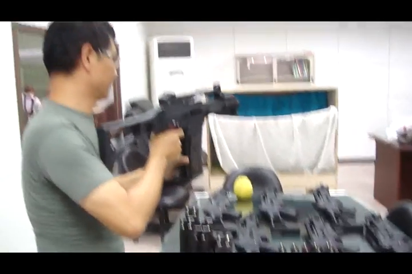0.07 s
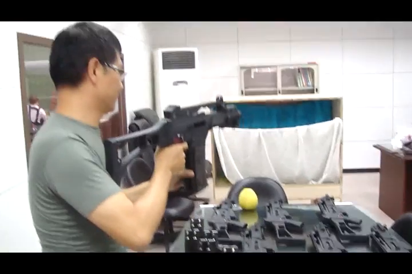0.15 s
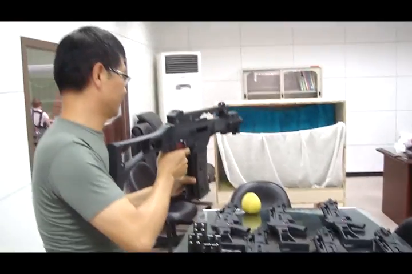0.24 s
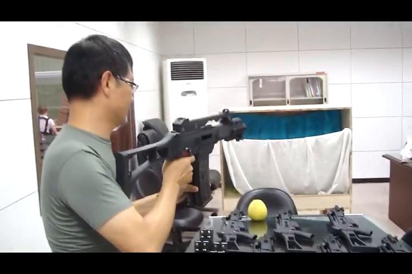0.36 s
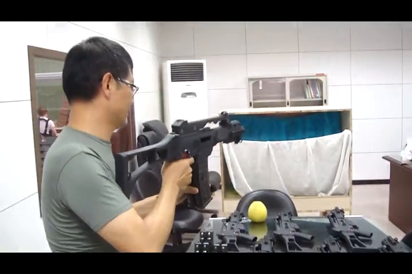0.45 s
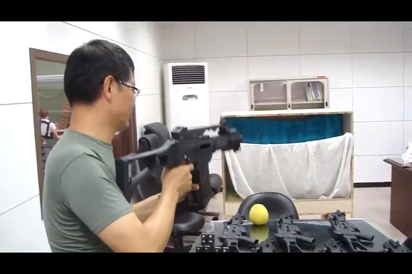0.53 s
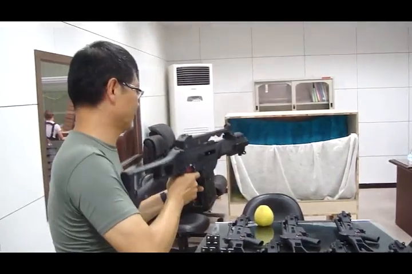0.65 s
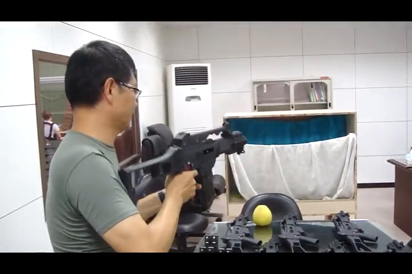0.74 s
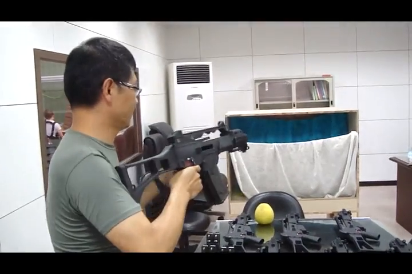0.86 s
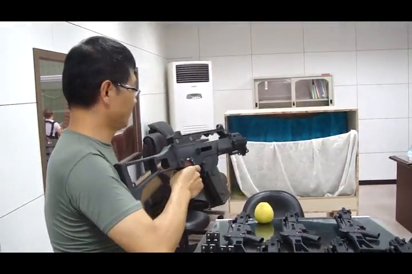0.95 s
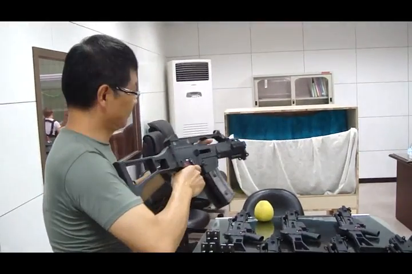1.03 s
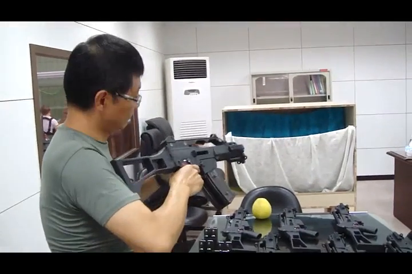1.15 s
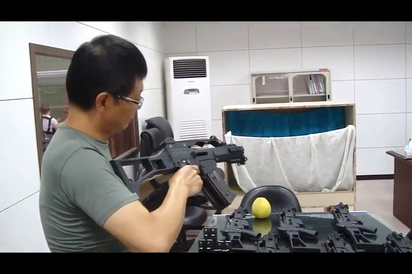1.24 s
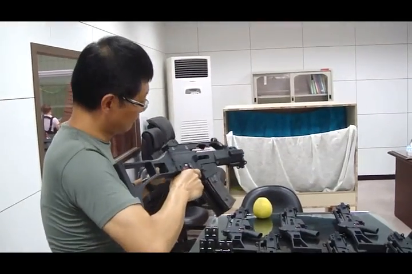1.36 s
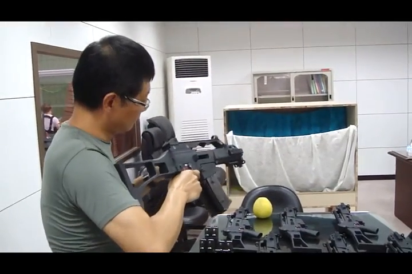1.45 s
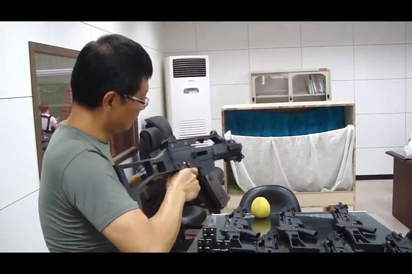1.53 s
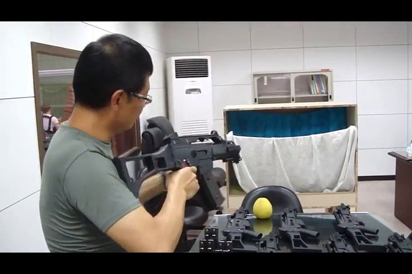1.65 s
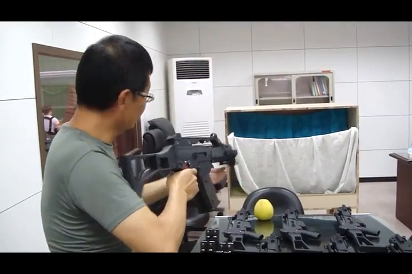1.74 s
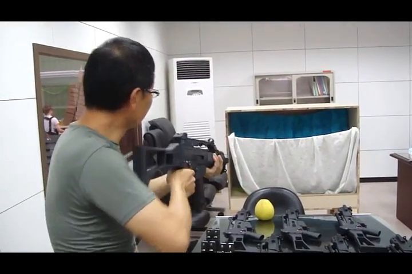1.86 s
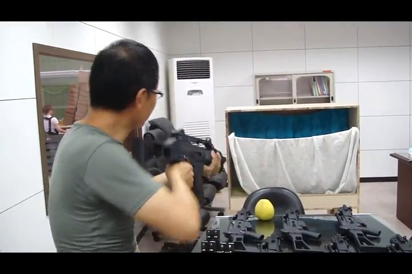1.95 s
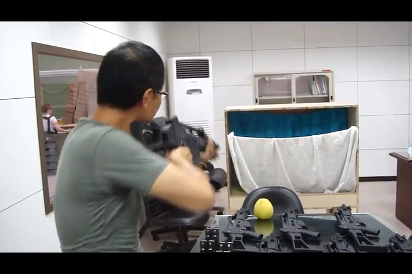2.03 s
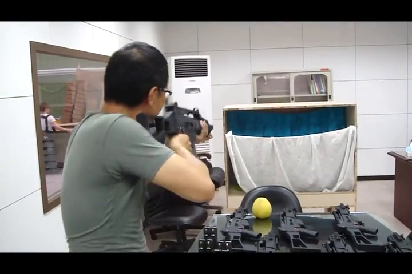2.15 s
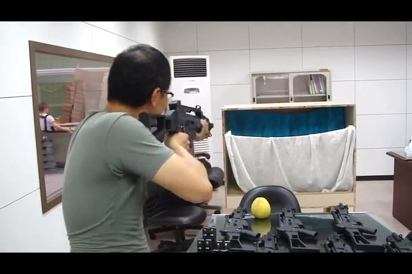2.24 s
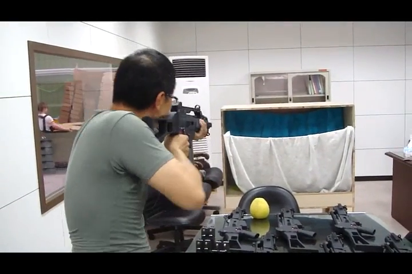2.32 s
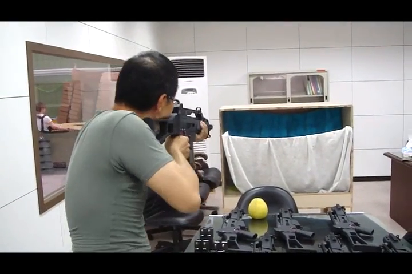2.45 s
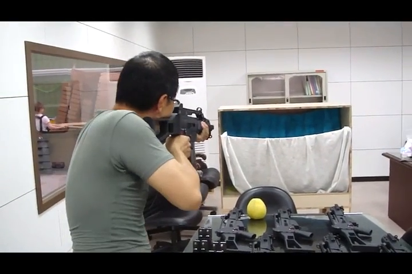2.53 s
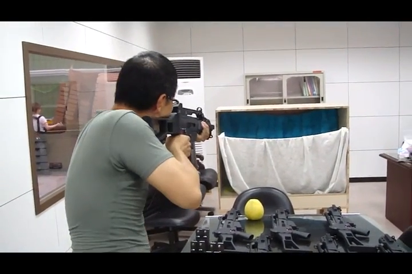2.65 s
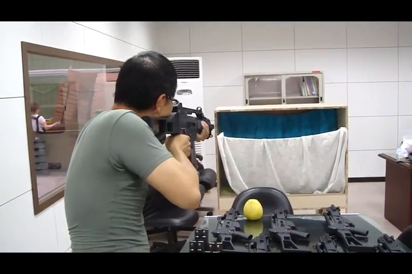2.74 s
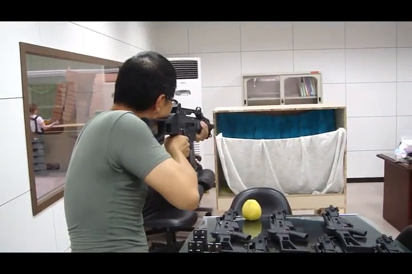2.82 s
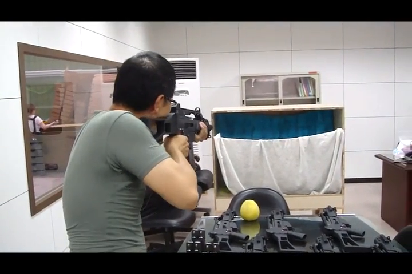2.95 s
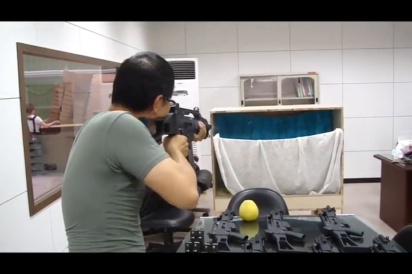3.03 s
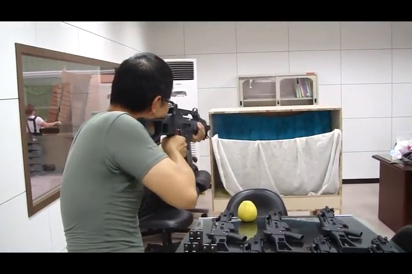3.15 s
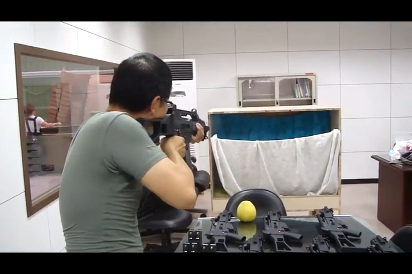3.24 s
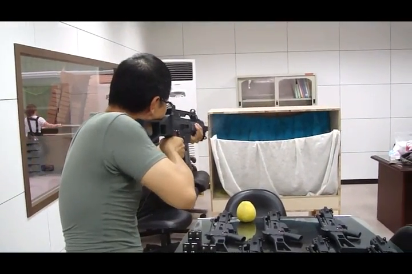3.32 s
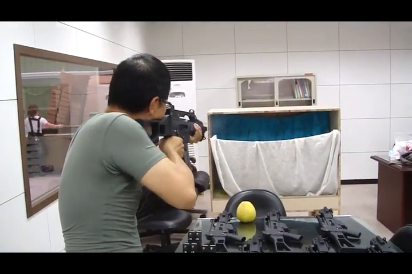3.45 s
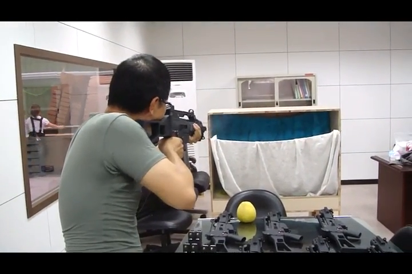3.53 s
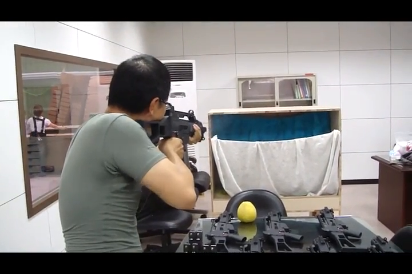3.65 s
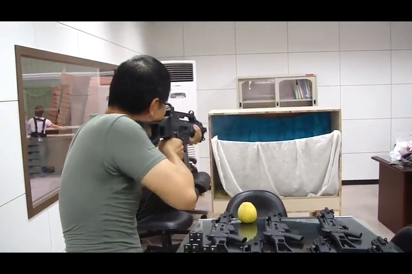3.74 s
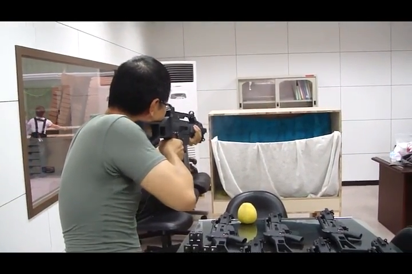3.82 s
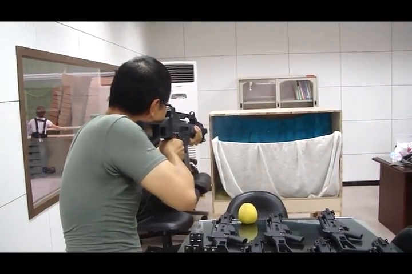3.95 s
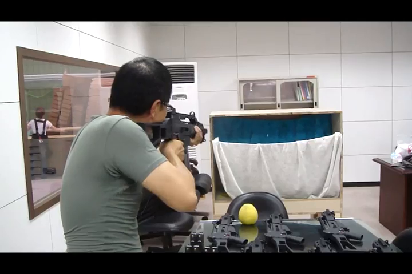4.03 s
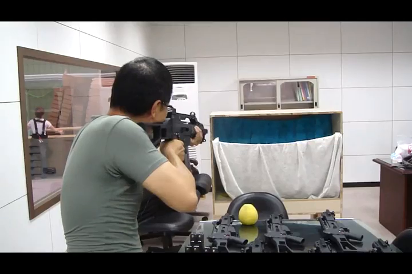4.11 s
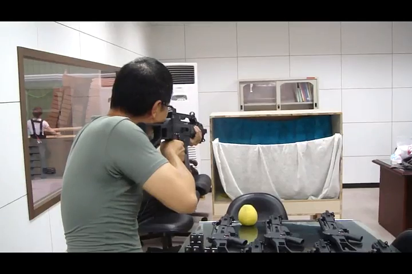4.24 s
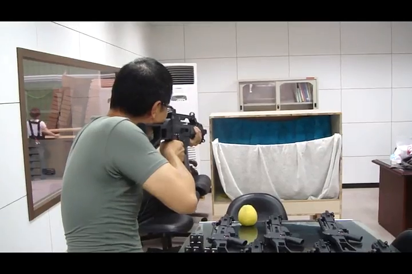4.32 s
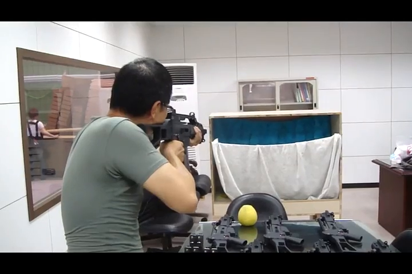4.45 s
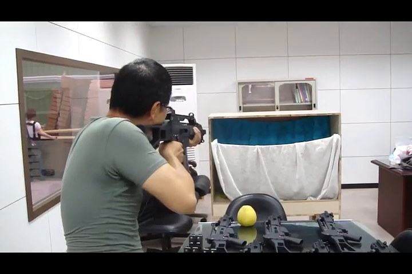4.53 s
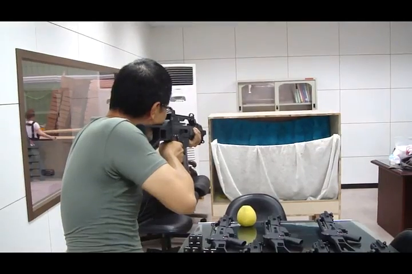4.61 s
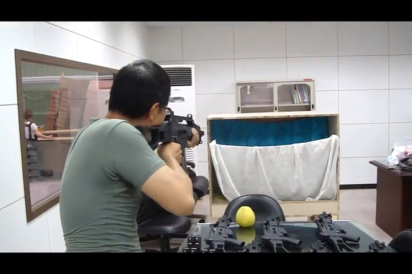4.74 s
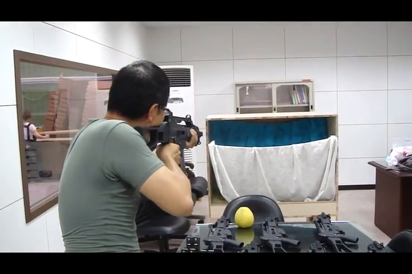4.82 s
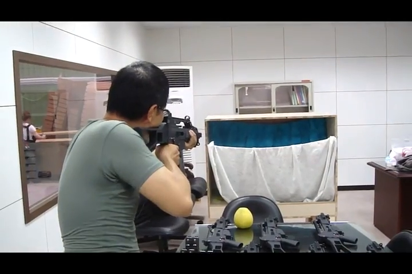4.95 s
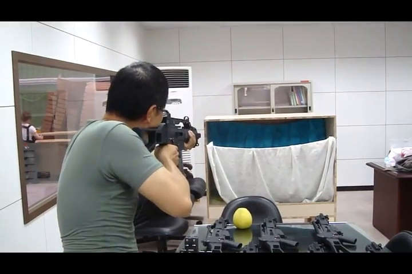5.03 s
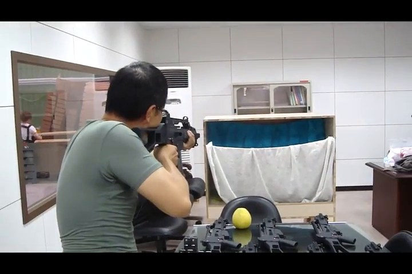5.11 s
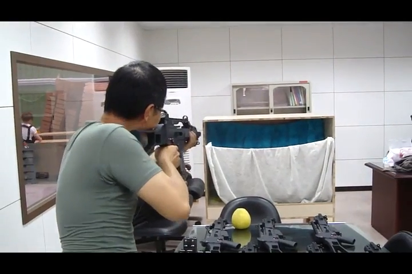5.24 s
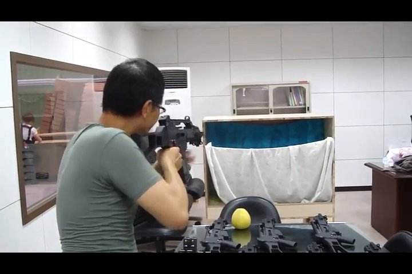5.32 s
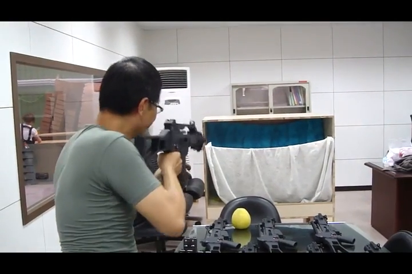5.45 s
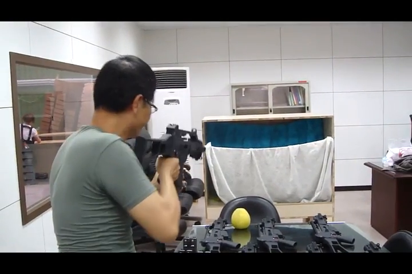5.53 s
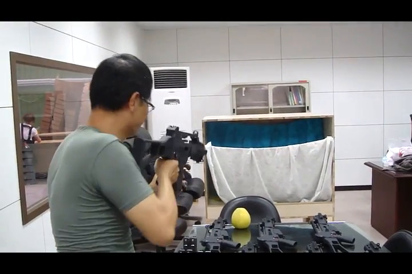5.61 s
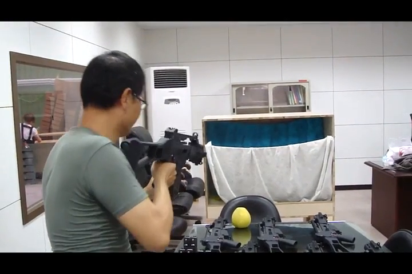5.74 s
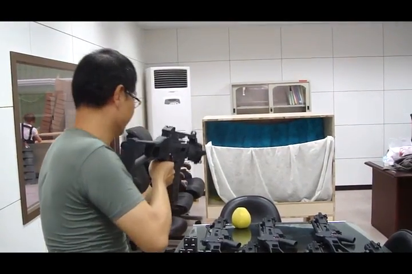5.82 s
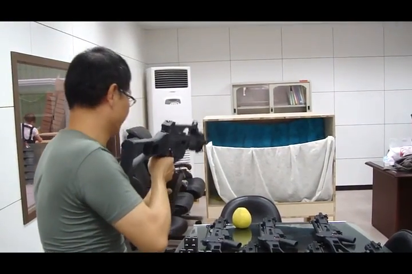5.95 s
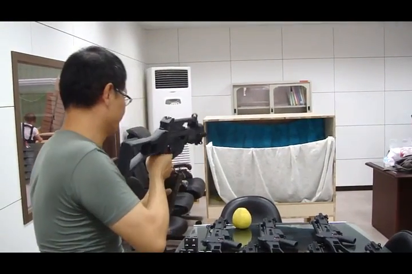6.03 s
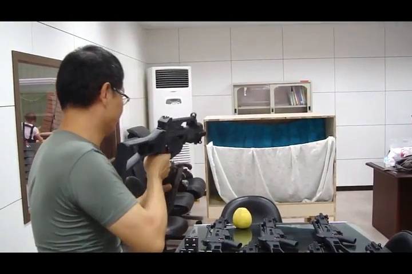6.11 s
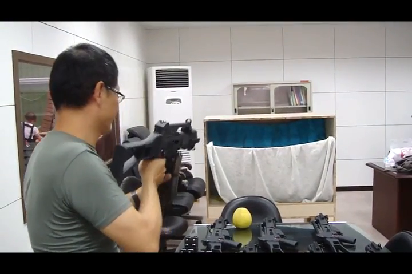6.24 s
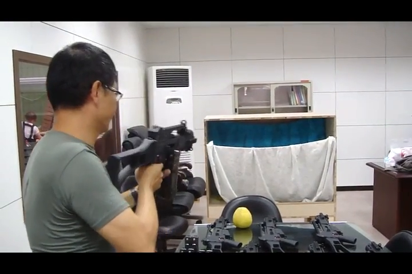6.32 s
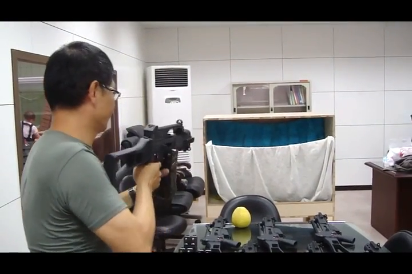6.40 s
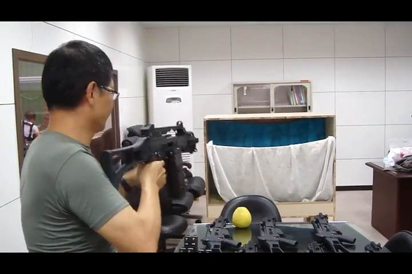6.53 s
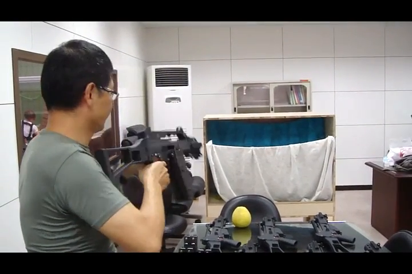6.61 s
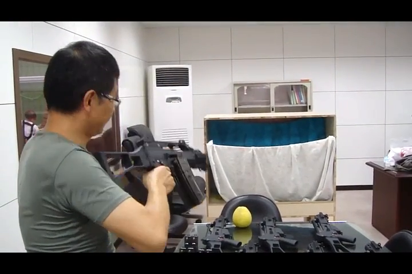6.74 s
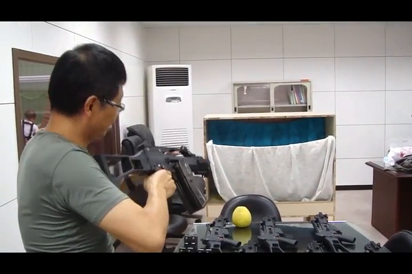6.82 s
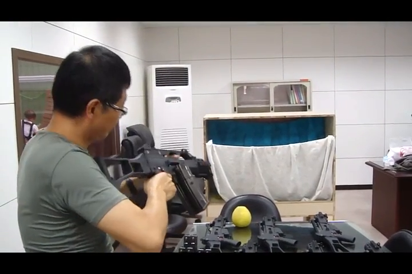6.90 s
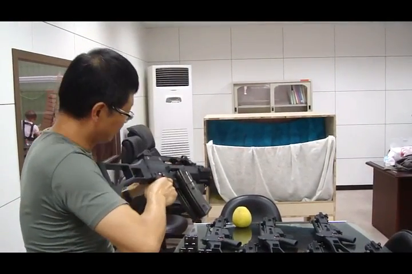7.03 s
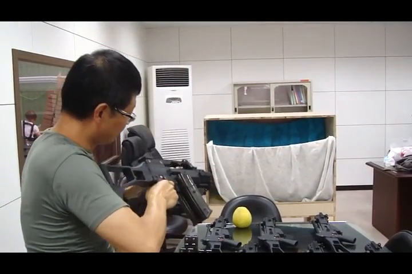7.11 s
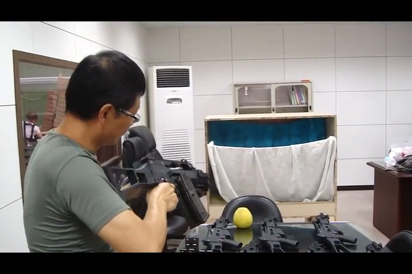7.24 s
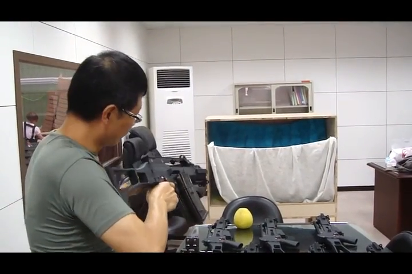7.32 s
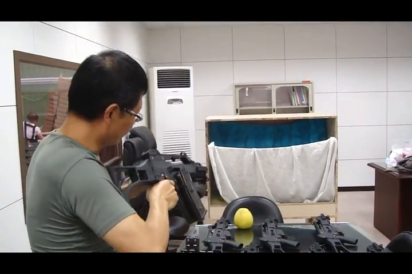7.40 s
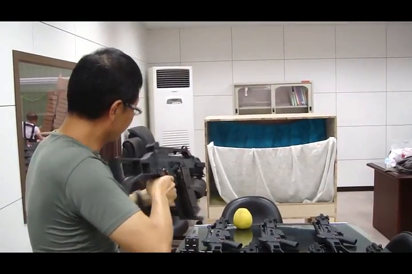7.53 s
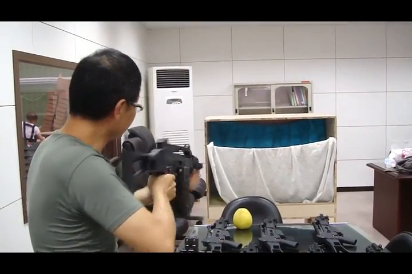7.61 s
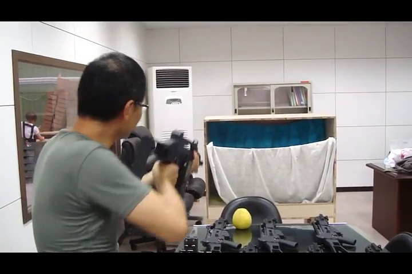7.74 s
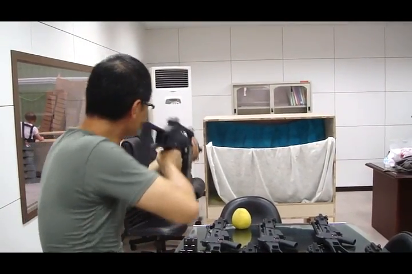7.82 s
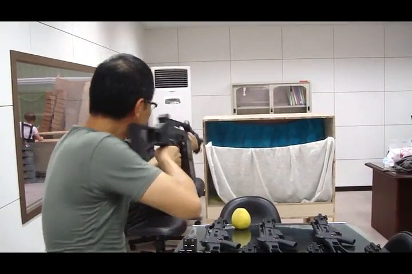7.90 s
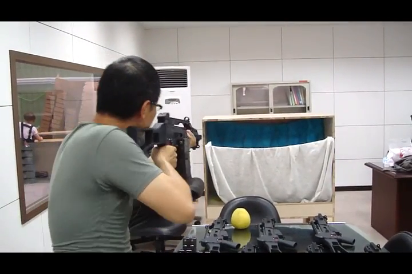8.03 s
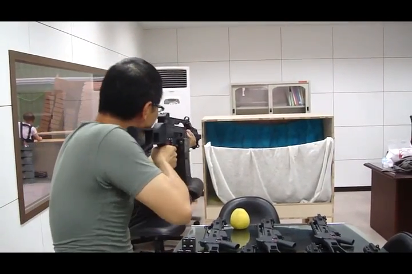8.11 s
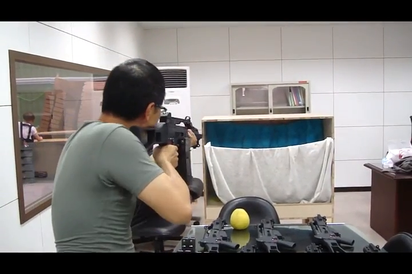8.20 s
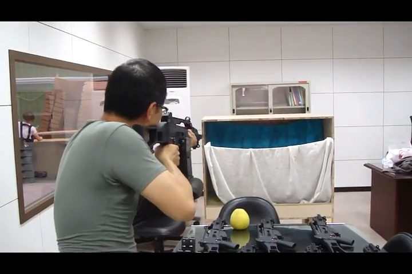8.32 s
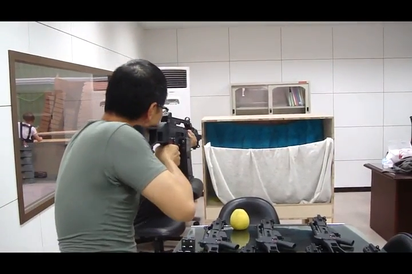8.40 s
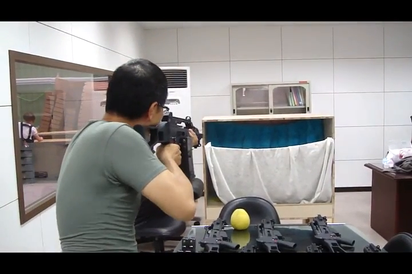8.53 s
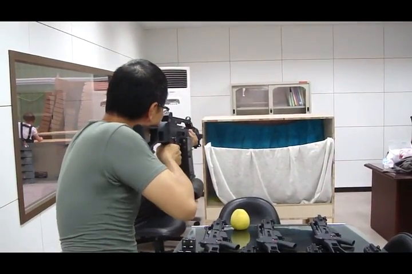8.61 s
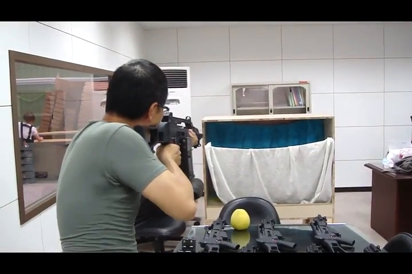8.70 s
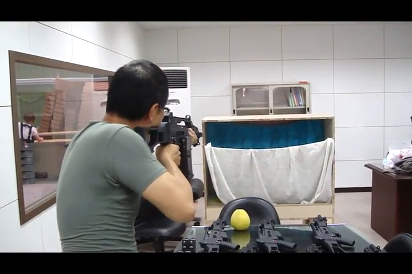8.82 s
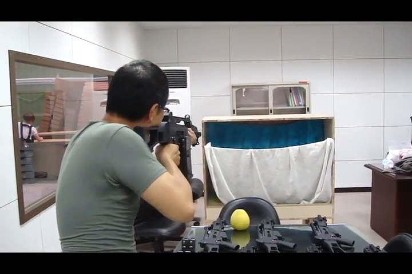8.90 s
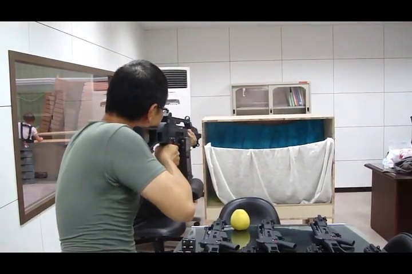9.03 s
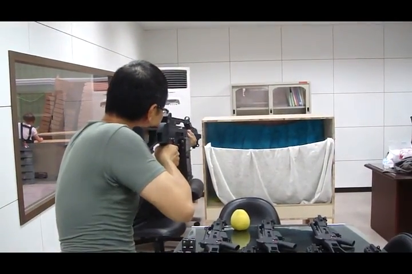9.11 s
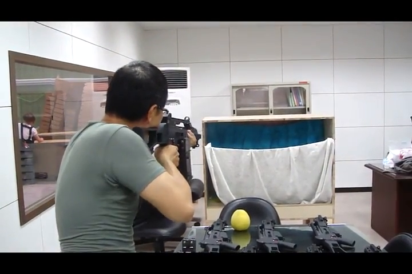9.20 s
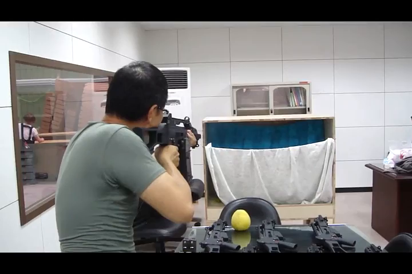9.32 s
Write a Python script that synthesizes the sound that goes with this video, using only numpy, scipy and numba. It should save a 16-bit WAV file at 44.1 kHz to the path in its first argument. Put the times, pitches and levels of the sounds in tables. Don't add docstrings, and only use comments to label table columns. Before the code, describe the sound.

A steady, mid-low whoosh of air cooling fills a bare tiled room throughout. Around 0.2-0.5 s, light hollow plastic knocks; at 0.6 s a magazine slaps home in a tight triple contact. A small catch snaps near 1.3 s with a hollow knock, and the bolt slams forward with a ringing metallic clack at 1.65 s. From 2.8 s full auto begins: sharp gas pops each trailed by bolt knocks, about seventeen per second, slowing to about ten and dulling slightly before stopping near 5 s. Echo decays. Knocks at 5.4-5.9 s, a very hard magazine slam at 6.2-6.3 s, a catch click at 7.05 s, another bolt slam at 7.5 s. At 8.4 s a second, steadier run fires about twelve shots per second until roughly 9.4 s. Reverberation lasts most of a second; fast compression pushes pops and echoes to similar loudness.

```python
import sys
import numpy as np
from scipy import signal
from scipy.fft import rfft, irfft, next_fast_len
from scipy.io import wavfile
from numba import njit

SR = 44100
rng = np.random.default_rng(int(sys.argv[2]) if len(sys.argv) > 2 else 0)


def wav_record(signal):
    frames = np.transpose(np.atleast_2d(signal))
    bounded = np.clip(frames, -1, 1)
    quanta = np.round(bounded * 32767).astype(np.int16)
    wavfile.write(sys.argv[1], SR, quanta)


def ratio_of_db(decibels):
    return 10 ** (np.asarray(decibels, float) / 20)


N = 412776


def colour(x, points):
    size = next_fast_len(N)
    hz = np.maximum(np.arange(size // 2 + 1) * SR / size, 1)
    point_hz, point_db = np.transpose(points)
    gain = ratio_of_db(np.interp(np.log(hz), np.log(point_hz), point_db))
    gain = gain / np.sqrt(np.mean(gain ** 2))
    return irfft(rfft(x, size) * gain, size)[..., :N]


def resonate(x, modes):
    out = 0
    for k, (hz, width_hz, db) in enumerate(modes):
        r = np.exp(-np.pi * width_hz / SR)
        poles = [1, -2 * r * np.cos(2 * np.pi * hz / SR), r * r]
        rung = signal.lfilter([1, 0, -1], poles, x + 1e-18)
        out = out + (-1) ** k * ratio_of_db(db) * np.sqrt((1 - r * r) / 2) * rung
    return out


def bursts(times_s, dbs, lengths_ms, room_db=0):
    t_ms = np.arange(1200) / SR * 1000
    out = np.zeros((2, N + len(t_ms)))
    grain = rng.standard_normal((len(times_s), len(t_ms)))
    lengths_ms = np.clip(lengths_ms, .15, 5)
    room_gain = ratio_of_db(room_db + 0 * dbs)
    for s, db, ms, far, noise in zip(times_s, dbs, lengths_ms, room_gain, grain):
        at = min(round(s * SR), N)
        shape = t_ms / ms * np.exp(1 - t_ms / ms)
        size = ratio_of_db(db) * np.sqrt(np.sum(shape ** 2))
        puff = shape * noise
        out[0, at:at + len(t_ms)] += size * puff / np.sqrt(np.sum(puff ** 2))
        out[1, at] += far * size * np.sign(noise[0])
    return out[:, :N]


# frequency in Hz, level in dB per Hz.
AIR_COLOUR = [(15, -55), (25, -30), (99, -21.5), (160, -9), (260, -7.5), (353, -1.5), (391, -9), (819, -4),
              (884, -7), (1230, -9.5), (1900, -14), (2450, -17), (5260, -32), (11000, -38), (14300, -81),
              (22000, -120)]


def air_noise():
    return ratio_of_db(-36.5) * colour(rng.standard_normal(N), AIR_COLOUR)


# start in seconds, crack in dB, hollow body over crack in dB, contact in ms.
SHELL_KNOCKS = [(0.229, -22, -2, 3.3), (0.37, -7, -4.5, 2.9), (0.385, -9.5, -17, 2.4),
                (0.502, -13, -6, 3.7), (0.524, -8, -5, 4.1), (0.558, -3, -8, 4.9), (1.359, -3.5, 2, 2.3),
                (5.414, -10, -12, 5.6), (5.758, -17, -15, 2.1), (5.825, -7.5, -8, 1.7),
                (5.837, -4.5, -5, 2.4), (5.880, -30, 4, 2.5), (6.705, -12, -9, 2.2),
                (7.144, -22, 10.5, 4.7), (7.421, -21, 6, 3.8), (7.455, -2.5, -1.5, 6.3),
                (7.991, -17, 0, 1.3)]
LATCH_CLICKS = [
    (1.226, -21.5, -14, 2.2),
    (1.258, -25, -30, 3.5),
    (1.268, -9, -34, 2.4),
    (7.039, -16.5, -28, 3.3),
    (7.062, -8.5, -34, 1.7),
]
BOLT_TICKS = [
    (1.338, -17, -16, 1.6),
    (1.605, -23, -10, 4.8),
    (1.622, -24, 16, 2.4),
    (2.7608, 0.5, 5, 3.5),
    (5.427, -28, 12, 3.8),
    (7.11, -13, -1, 3.9),
    (8.390, -5, -10, 3.9),
    (8.396, 3, -20, 1.2),
    (8.401, 10, -20, 2.5),
    (7.436, -21, 1, 5.6),
]
MAGAZINE_SLAMS = [
    (0.568, 5.5, -15, 3.6),
    (0.579, 3.5, -12, 6),
    (0.589, 13.5, -11.5, 5),
    (6.212, 1.5, 2.5, 5.5),
    (6.223, 10, -11, 4.8),
    (6.295, 9, -24, 1.9),
    (6.3015, 23, -10.5, 1.26),
]
BOLT_SLAMS = [
    (1.633, -6, -11, 1.2),
    (1.637, 5, -3.5, 1.8),
    (1.648, 19, -8, 1.1),
    (7.463, 3.5, -0.5, 1.9),
    (7.469, 9, -4, 2.1),
    (7.478, 15.5, -9.5, 2.5),
]
# steel latch over crack in dB, bolt over crack in dB, extra to the room in dB.
STRUCK = [
    (-23, -15, -0.5),
    (-1, 0.5, -0.5),
    (-6, 1.5, -3),
    (-29, -14.5, 0),
    (-41, -4.5, 5.5),
]
# frequency in Hz, level in dB per Hz.
CRACK_COLOUR = [(59, -68), (100, -41), (541, -11), (919, -4), (1050, -3.5), (2650, -5), (4080, -23.5),
                (4780, -13.5), (10900, -38.5), (14200, -66), (22000, -120)]
# frequency in Hz, width in Hz, level in dB.
THUMP_MODES = [(44.7, 76, -33)]
BODY_MODES = [(592, 116, -9), (1116, 115, 3.5), (1173, 260, -0.5)]
LATCH_MODES = [(1980, 110, -2), (2750, 200, -7), (4260, 200, 1), (8400, 1200, -5)]
BOLT_MODES = [(3220, 1220, 0.55), (8600, 21000, -15.5)]


def handling():
    kinds = (SHELL_KNOCKS, LATCH_CLICKS, BOLT_TICKS, MAGAZINE_SLAMS, BOLT_SLAMS)
    contacts = [(*row, *struck) for rows, struck in zip(kinds, STRUCK) for row in rows]
    s, db, body_db, ms, latch_db, bolt_db, room_db = np.transpose(contacts)
    db = db - 11.5
    contact = bursts(s, db - 5.0, ms, room_db)
    thump = ratio_of_db(-31.0) * resonate(contact[0], THUMP_MODES)
    crack = colour(contact, CRACK_COLOUR) + thump * [[1], [0]]
    rings = 0
    for modes, part_db in ((BODY_MODES, body_db), (LATCH_MODES, latch_db), (BOLT_MODES, bolt_db)):
        rings = rings + resonate(bursts(s, db + part_db, ms, room_db), modes)
    return crack, rings


# frequency in Hz, time to fall 60 dB in seconds.
ROOM_T60 = [(120, 0.1), (500, 0.83), (1200, 0.85), (3000, 0.84), (6000, 0.77), (10500, 0.58)]


def room(x):
    rise_ms = 10
    t = np.arange(int(1.2 * SR)) / SR
    edges_hz = 40 * 2 ** np.arange(0, 8.4, 1 / 3)
    point_hz, point_s = np.transpose(ROOM_T60)
    white, echo = rng.standard_normal((2, len(t))), 0
    for k, (low, high) in enumerate(zip(edges_hz, edges_hz[1:])):
        t60_s = np.interp(np.log(low * high) / 2, np.log(point_hz), point_s)
        band_pass = signal.butter(2, [low, high], "band", fs=SR, output="sos")
        band = signal.sosfilt(band_pass, white[k % 2])
        echo = echo + band * ratio_of_db(-60 * t / t60_s) / np.sqrt(t60_s)
    echo = echo * (1 - np.exp(-(1000 * t / rise_ms) ** 2))
    return signal.fftconvolve(x, echo / np.sqrt(np.sum(echo ** 2)))[:N]


# fixed delay in ms, share of the cycle, level over the pop in dB, shroud ring in dB, length in ms.
CYCLE_A = [
    (0, 0, -2, 7, .45),
    (2.5, 0, -6, 6, .9),
    (11.5, 0, -4, 4, .5),
    (13.5, 0, -6, 5, 1),
    (3, .27, -6, 0, 2.5),
    (3, .36, -12, -6, 3),
    (0, .78, -11, 1, 5),
]
CYCLE_B = [
    (0, 0, -5, 4, 1.8),
    (9, 0, -9, 0, 2),
    (20.5, 0, -9, 3, 2),
    (26.8, 0, 7, -3, .25),
    (28, 0, -5, 6, 1.8),
    (47, 0, -8, 2, 2.5),
    (58, 0, -8, 0, 2),
]
# shots fired, period in ms.
PACE_A = [(0, 59.8), (4, 59.74), (9, 63.51), (15, 74.28), (18, 76.79), (29, 95.58)]
PACE_B = [(0, 79.87), (12, 79.87)]
# frequency in Hz, level in dB per Hz.
RUN_A_COLOUR = [(35, -65), (60, -31), (182, -13.5), (322, -10.5), (351, -6), (391, -8), (705, 3.5),
                (1580, 0.5), (2850, 1), (4500, -1.5), (9040, -10.5), (11000, -17), (14300, -47),
                (22000, -120)]
RUN_B_COLOUR = [(35, -76), (60, -34), (129, -26.5), (217, -23.5), (409, -12), (705, -3.5), (877, -7.5),
                (1360, -4), (1550, -8.5), (3170, -5), (8110, -16.5), (11000, -21.5), (14300, -70),
                (22000, -120)]
# frequency in Hz, width in Hz, level in dB.
SHROUD_A_MODES = [(4400, 1500, -5.0)]
SHROUD_B_MODES = [(3200, 900, -5.0)]


def full_auto(start_s, run_db, pace, cycle, spectrum, shroud):
    scatter_db, first_pop_db, empty_db = 1.5, -36, -40
    cold_hz, cold_share_per_s = 5600, 0.1
    aimed_away_db = 2.5
    fired, gap_ms = np.transpose(pace)
    period_s = np.interp(np.arange(fired[-1] + 1), fired, gap_ms) / 1000
    pop_s = start_s + np.cumsum(period_s) - period_s
    delay_ms, share, knock_db, ring_db, ms = np.transpose(cycle)
    times_s = pop_s[:, None] + delay_ms / 1000 + share * period_s[:, None]
    dbs = knock_db + run_db + scatter_db * rng.standard_normal(times_s.shape)
    dbs[0, :2] += first_pop_db
    dbs[-1, -1] += empty_db
    lengths_ms = np.tile(ms, len(period_s))
    knocks = bursts(times_s.ravel(), dbs.ravel(), lengths_ms)
    rung = bursts(times_s.ravel(), (dbs + ring_db).ravel(), lengths_ms)
    top = signal.sosfilt(signal.butter(2, cold_hz, "high", fs=SR, output="sos"), knocks)
    knocks = knocks - np.clip(cold_share_per_s * (np.arange(N) / SR - start_s), 0, 1) * top
    shots = colour(knocks, spectrum) * [[1], [ratio_of_db(aimed_away_db)]]
    return shots + resonate(rung[0], shroud) * [[1], [0]]


def scene():
    air = air_noise()
    crack, rings = handling()
    run_a = full_auto(2.75435, 9, PACE_A, CYCLE_A, RUN_A_COLOUR, SHROUD_A_MODES)
    run_b = full_auto(8.3842, 17, PACE_B, CYCLE_B, RUN_B_COLOUR, SHROUD_B_MODES)
    direct, spread = crack + run_a + run_b
    echo = ratio_of_db(-4) * (room(spread) + room(rings[1]))
    return (direct + rings[0] + echo + air)[None]


def one_pole(x, seconds):
    r = np.exp(-1 / (seconds * SR))
    return signal.lfilter([1 - r], [1, -r], x)


@njit
def follow(wanted_db, attack, release):
    out, cut = np.zeros(len(wanted_db)), 0.
    for i in range(len(wanted_db)):
        cut += (wanted_db[i] - cut) * (attack if wanted_db[i] > cut else release)
        out[i] = cut
    return out


def gain_control(x):
    ceiling_db, squeeze = -16, 0.93
    sense_ms, attack_ms, release_ms, ahead_ms = 0.3, 2.6, 45, 0.6
    slow_share, slow_s = 0.66, 1.36
    over_db = 10 * np.log10(one_pole(x ** 2, sense_ms / 1000) + 1e-12) - ceiling_db
    wanted_db = squeeze * np.maximum(over_db, 0)
    cut_db = follow(wanted_db, 1000 / (attack_ms * SR), 1000 / (release_ms * SR))
    cut_db = np.maximum(cut_db, slow_share * one_pole(cut_db, slow_s))
    ahead_db = np.interp(np.arange(N) + ahead_ms * SR / 1000, np.arange(N), cut_db)
    x = x * ratio_of_db(-ahead_db)
    return x / (1 + (1.12 * x) ** 4) ** .25


def half_rate(x):
    x = signal.sosfilt(signal.ellip(10, .5, 75, 10950, fs=SR, output="sos"), x)
    mirror = x * np.resize([1., -1.], N)
    mirror = signal.sosfilt(signal.ellip(8, .5, 60, 13050, "high", fs=SR, output="sos"), mirror)
    mirror = signal.sosfilt(signal.butter(12, 13300, fs=SR, output="sos"), mirror)
    return x + ratio_of_db(-14.5) * mirror


def band_limit(x):
    return signal.sosfilt(signal.butter(12, 15560, fs=SR, output="sos"), x)


def record(dry):
    mix = half_rate(gain_control(dry[0]))[None]
    return band_limit(mix)


dry = scene()
out = record(dry)
wav_record(out)
```